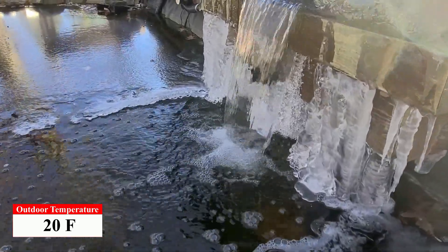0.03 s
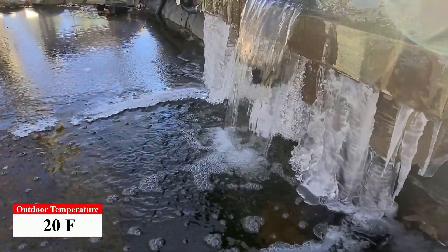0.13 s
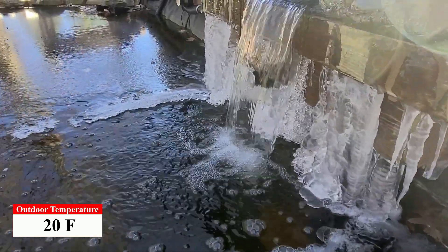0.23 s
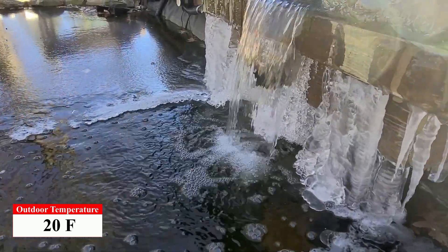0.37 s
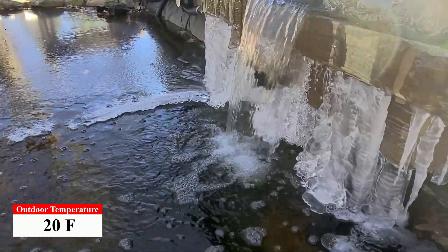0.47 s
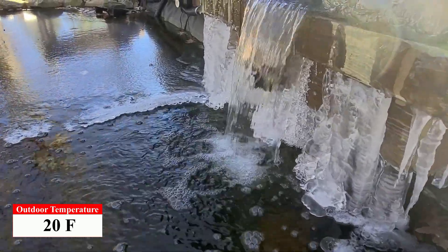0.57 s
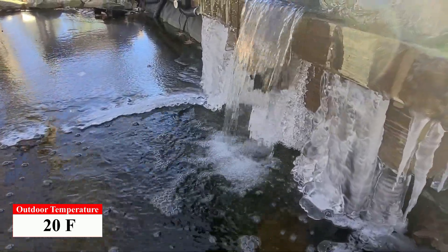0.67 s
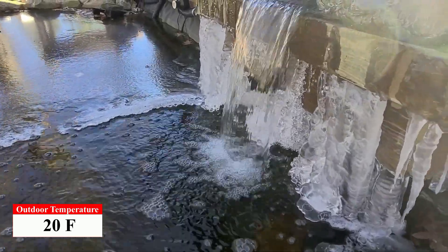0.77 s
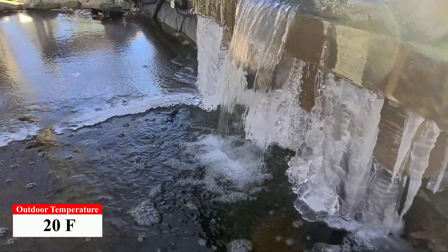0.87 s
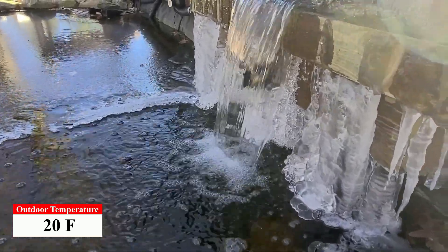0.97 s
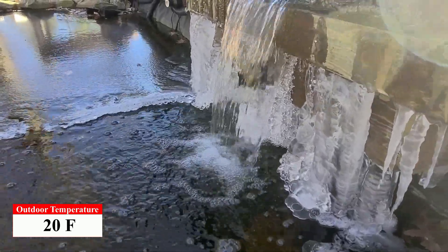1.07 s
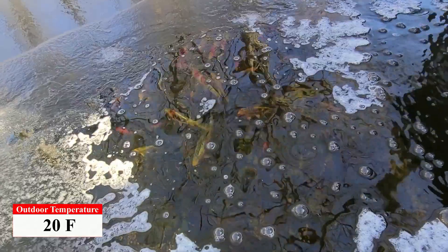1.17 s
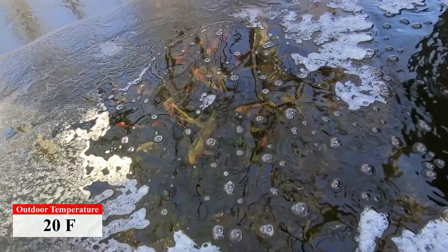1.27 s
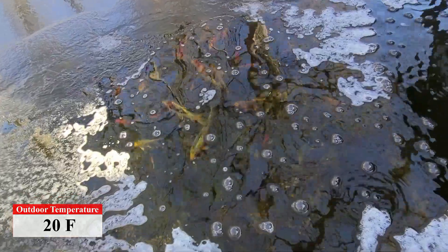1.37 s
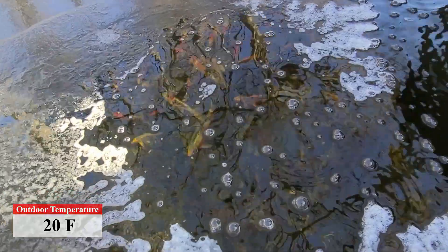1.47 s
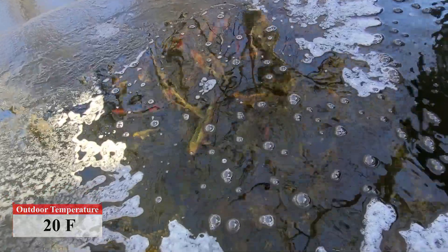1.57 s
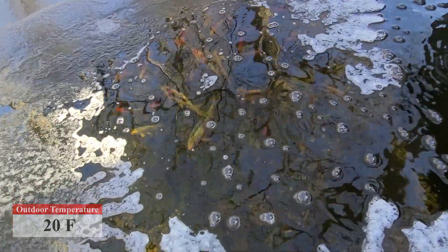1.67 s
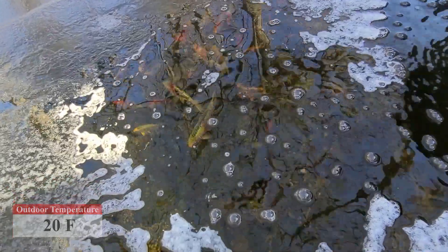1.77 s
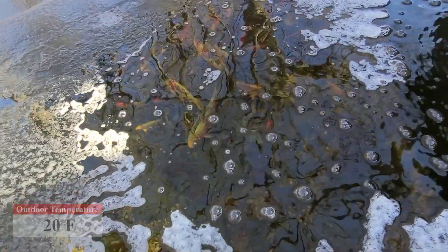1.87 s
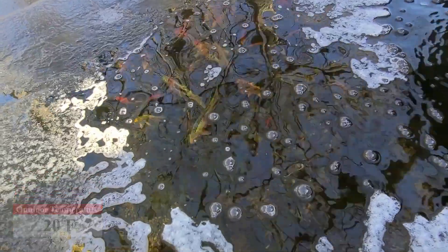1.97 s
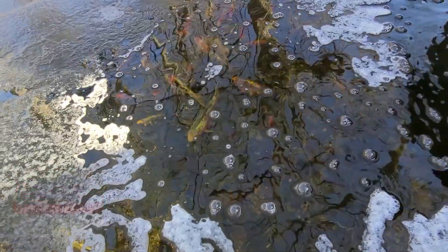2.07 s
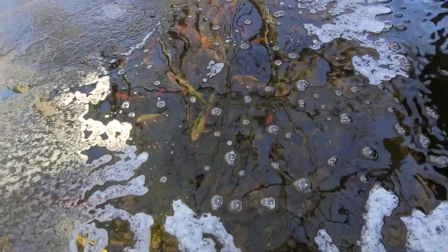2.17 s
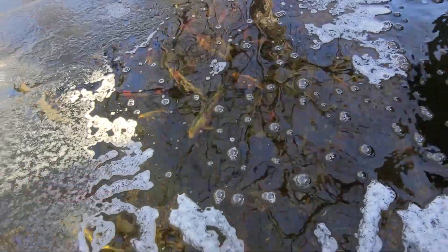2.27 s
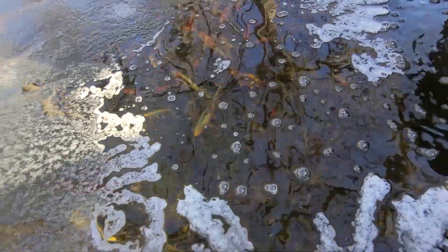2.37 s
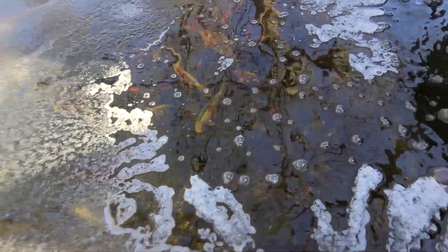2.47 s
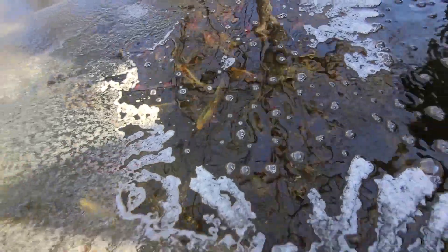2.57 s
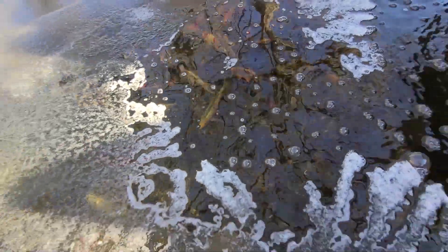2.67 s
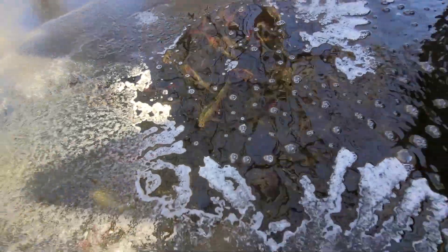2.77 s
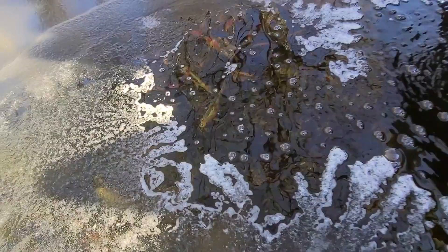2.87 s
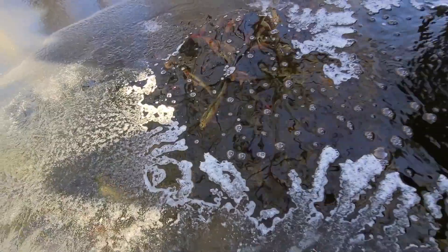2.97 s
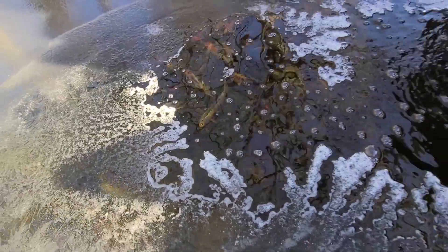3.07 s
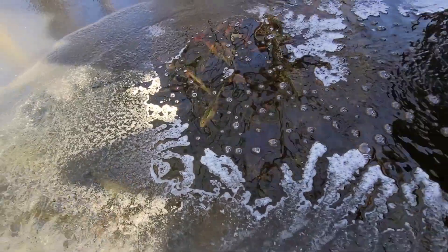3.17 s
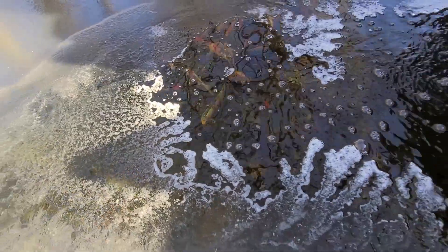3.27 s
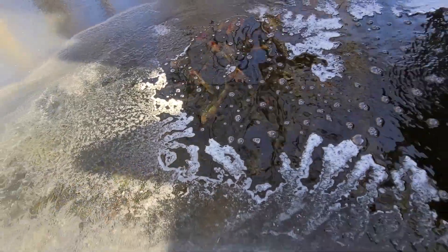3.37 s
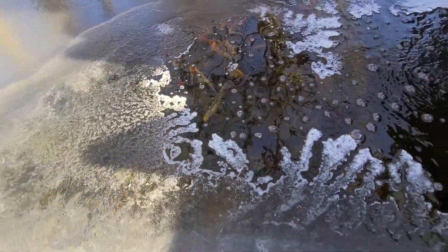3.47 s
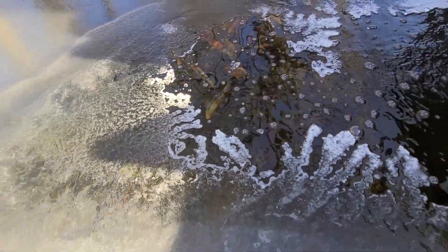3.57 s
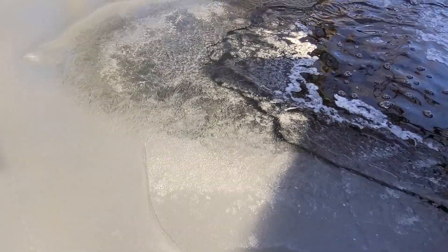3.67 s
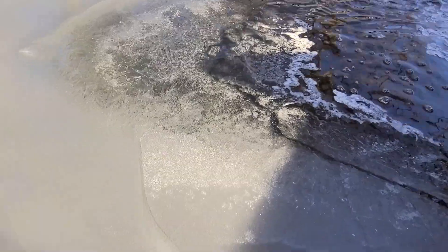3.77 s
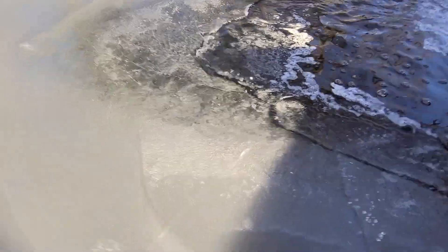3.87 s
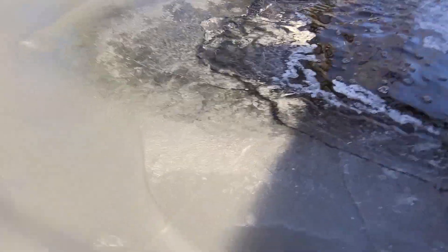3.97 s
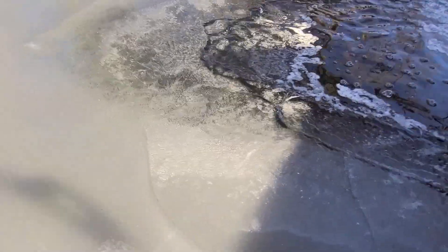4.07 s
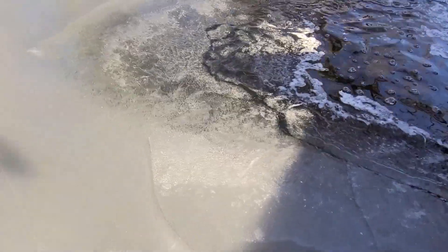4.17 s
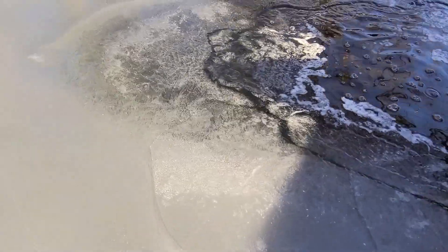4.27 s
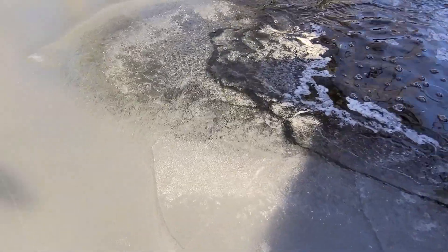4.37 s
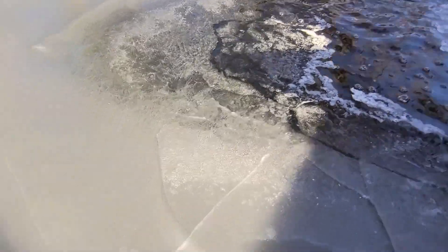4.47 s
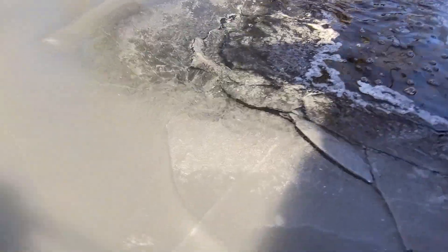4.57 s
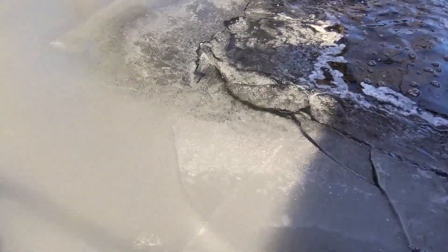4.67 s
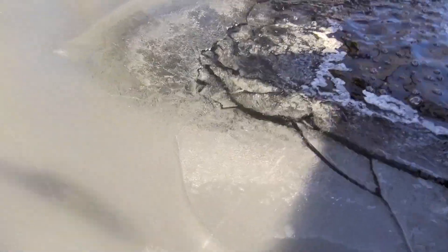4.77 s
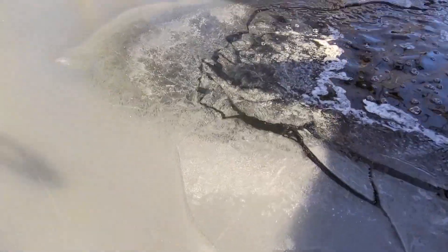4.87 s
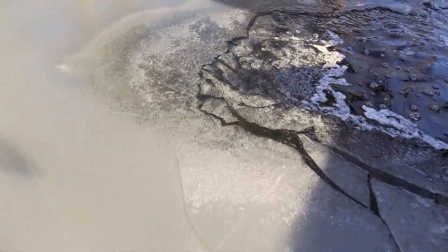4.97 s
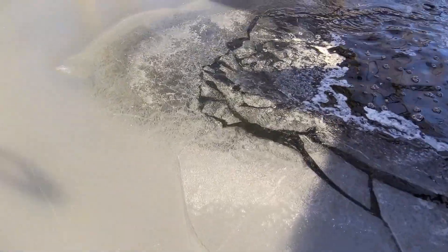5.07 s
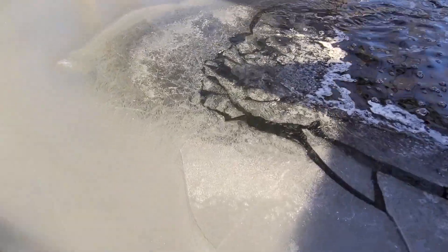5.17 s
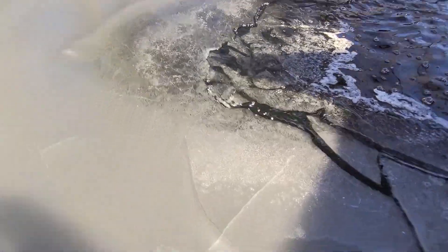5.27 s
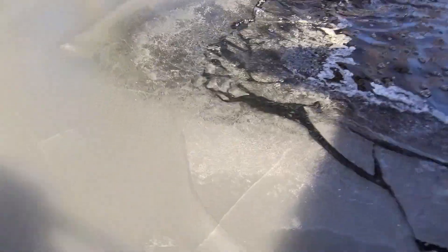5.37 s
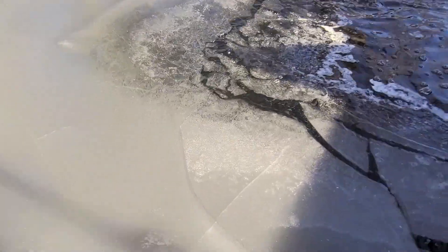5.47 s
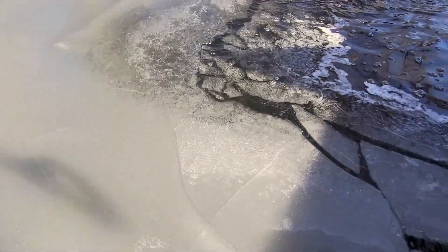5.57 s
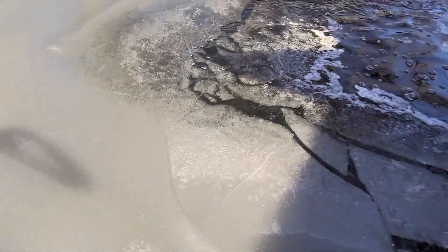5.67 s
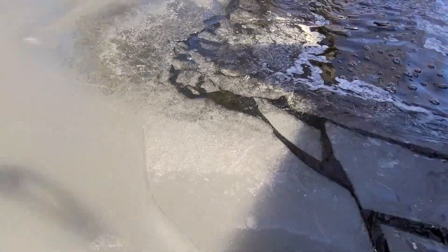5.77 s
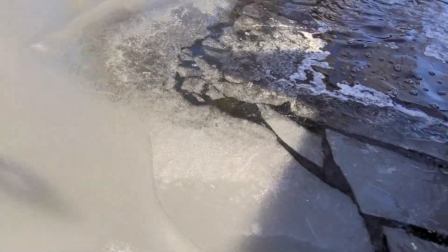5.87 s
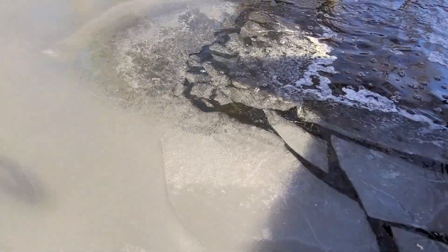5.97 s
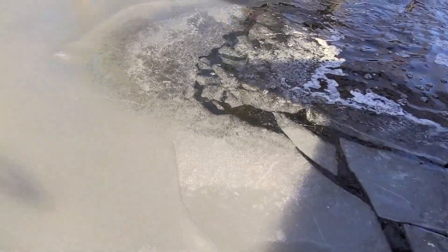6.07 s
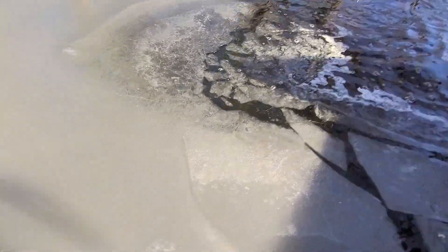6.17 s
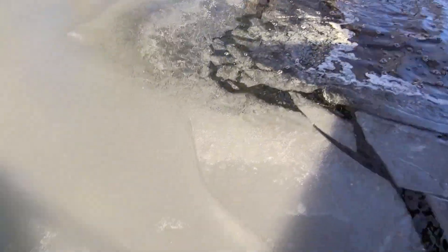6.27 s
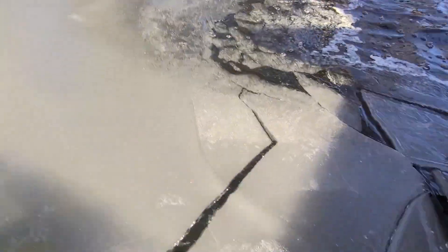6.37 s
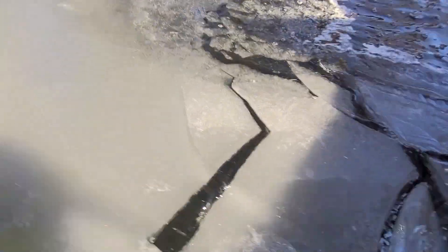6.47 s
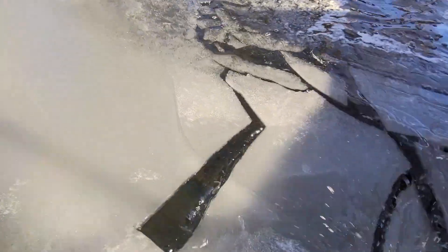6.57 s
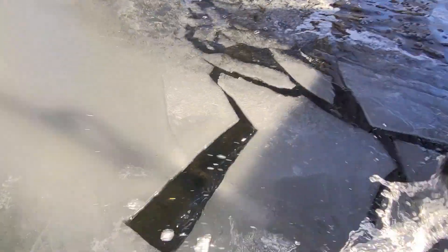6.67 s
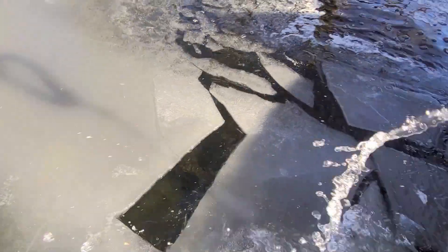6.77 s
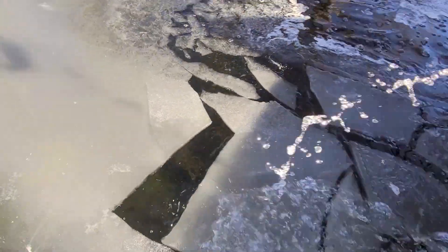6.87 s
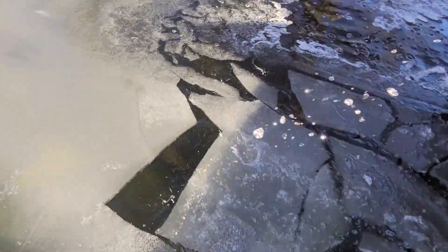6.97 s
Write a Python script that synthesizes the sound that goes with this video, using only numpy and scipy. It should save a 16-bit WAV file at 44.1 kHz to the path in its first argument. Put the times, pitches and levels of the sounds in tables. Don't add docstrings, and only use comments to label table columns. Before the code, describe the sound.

Steady close pond waterfall with bubbling drops; later four sharp, crunching knocks on ice ring and boom, the last breaking through into gulping water.

```python
import sys
import numpy as np
from scipy import signal
from scipy.fft import rfft, irfft, next_fast_len
from scipy.io import wavfile
from scipy.ndimage import uniform_filter1d, map_coordinates

SR = 44100
rng = np.random.default_rng(int(sys.argv[2]) if len(sys.argv) > 2 else 0)


def to_linear_factor(level_db):
    exponent = np.asarray(level_db, float) / 20
    return 10 ** exponent


def put_to_file(sound):
    columns = np.atleast_2d(sound).T
    safe = np.clip(columns, -1, 1)
    whole_steps = np.round(safe * 32767)
    wavfile.write(sys.argv[1], SR, whole_steps.astype(np.int16))


N = 309135
LAG_S = 20 / SR

# (roar [dB], spray [dB], spray drift as the view turns [dB/s])
TAKE_LEVELS = [
    (-35, -42.5, 1),
    (-34.5, -41, -1.25),
    (-38, -49, 0.5),
    (-35.5, -45.5, -1.5),
]
TAKE_JOINS = [
    1.175,
    3.642,
    5.778,
]
# (time [s], level [dB])
RUMBLE_LEVEL = [(0, -37), (0.36, -33.5), (1.17, -36.5), (1.19, -47), (1.5, -37.5), (2.32, -40),
                (2.75, -41.5), (2.96, -40.5), (3.12, -39), (3.3, -35), (3.63, -40), (3.66, -39), (4.2, -40),
                (5.0, -38), (5.77, -39.5), (6.0, -37.5), (6.6, -36.5), (7.01, -42)]
# (time [s], depth [dB])
GAIN_DUCKS = [
    (3.642, 4.5),
    (3.87, 9.5),
    (4.52, 7.5),
    (5.28, 7),
    (5.778, 1.5),
    (6.5, 5),
]
# (frequency [Hz], density [dB/Hz])
RUMBLE_SPECTRUM = [(12, -46), (20, -52), (45, -0.5), (64, 5.5), (81, 4.5), (113, -8.5), (248, -21.5),
                   (300, -21.5), (400, -22.5), (520, -32), (880, -120)]
# (frequency [Hz], density [dB/Hz])
ROAR_SPECTRUM = [(120, 0.5), (200, -10.5), (364, -9), (462, -5.5), (540, -5), (729, 1), (972, -1),
                 (1770, -3.5), (2400, -16.5), (3500, -17.5), (4550, -68), (7700, -120)]
# (frequency [Hz], density [dB/Hz])
SPRAY_SPECTRUM = [(1180, -28), (2000, -3), (2240, -2), (3190, -5), (4090, -7), (5190, -11.5), (6880, -12.5),
                  (8820, -9.5), (15100, -18), (16100, -16), (16500, -47)]
# (frequency [Hz], likeness [-1 to 1])
RUMBLE_LIKENESS = [(60, 1), (130, 0.94), (290, 0.69), (640, 0.89), (1410, -0.11), (3100, -0.56),
                   (6820, 0.13), (15000, -0.58)]
# (frequency [Hz], likeness [-1 to 1])
FALLS_LIKENESS = [(300, 0.99), (700, 0.12), (1400, 0.096), (3000, 0.44), (6000, 0.054), (12000, 0.046)]
# (frequency [Hz], left minus right [dB])
POND_LEAN = [(60, -2), (110, 0), (200, -3), (380, -0.5), (700, -1.5), (1290, 1), (2380, 0.0), (4400, -0.5),
             (8120, -4), (15000, -5)]
# (time [s], peak [dB], pitch [Hz], left minus right [dB])
DROP_CLUSTERS = [(0.019, -26.5, 5230, 3), (0.1217, -23, 1780, 0), (0.1916, -22, 1480, 0),
                 (0.2414, -28, 3400, 2), (0.3362, -26, 2430, 9), (0.3672, -23, 900, 1),
                 (0.437, -26, 1360, 1), (0.5118, -26, 1870, 0), (0.5507, -21.5, 3250, -1),
                 (0.6365, -30, 1780, -2), (0.6785, -27, 2730, 4), (0.6894, -30, 4070, 0),
                 (0.7004, -24, 1350, 1), (0.7503, -23, 935, 1), (0.7633, -24, 1250, 0),
                 (0.768, -30, 5200, 0), (0.871, -30, 3900, 0), (0.9329, -24, 3300, 1),
                 (0.9518, -22, 1940, 0), (0.9648, -32, 5850, 4), (0.9678, -21.5, 1240, -9),
                 (0.9778, -32, 3120, 1), (1.1055, -28, 5200, 9), (1.3027, -23, 1990, 5),
                 (1.3895, -32, 3470, 2), (1.4065, -31, 2520, 0), (1.4574, -22, 765, -4),
                 (1.8295, -26, 1310, 9), (1.8784, -27, 1310, -2), (2.0869, -26, 1890, 1),
                 (2.1209, -33, 4080, -4), (2.517, -31, 1450, 0), (2.6726, -30, 2700, 6),
                 (2.6776, -27, 2050, 6), (2.6836, -26, 1380, 9), (2.7883, -34, 5100, -1),
                 (2.8971, -33, 4000, -5), (2.9131, -26, 1920, 3)]
# (time [s], peak [dB], pitch [Hz], left minus right [dB])
BRIGHT_DROPS = [(0.0199, -22.5, 2340, 3), (0.0493, -23, 3330, 4.5), (0.1007, -22.5, 3320, 3.5),
                (0.232, -30, 2530, 7), (0.3287, -27, 3200, 2), (0.3691, -22, 3670, 3.5),
                (0.4683, -28, 3220, 0), (0.5327, -26, 8600, -1.5), (0.551, -22, 3180, -2.5),
                (0.69, -17.5, 3480, 3), (0.815, -22.5, 3220, 0), (0.9403, -19, 3180, 3),
                (0.9577, -23, 2570, -6), (1.0091, -22.5, 3800, -0.5), (1.0809, -26, 2320, 8),
                (1.0984, -18.5, 2640, 4), (1.2182, -35, 2470, -1), (1.3418, -27, 2440, 3),
                (1.3903, -24, 2550, 2), (1.5579, -25, 4000, -8), (1.5933, -25.5, 2670, -2),
                (1.802, -29, 2440, 1), (2.1783, -25, 2600, 2), (2.4244, -24, 2490, 0),
                (2.6768, -20.5, 2600, 2.5), (2.7896, -24, 2500, 2), (2.8449, -28, 3750, 1.5),
                (2.8978, -26.5, 3080, 0), (3.1098, -24, 3580, -4.5), ]
# (time [s], peak [dB], pitch [Hz], left minus right [dB])
SINGLE_DROPS = [(0.0275, -27.5, 1930, -6), (0.0566, -23, 1240, 0.5), (0.217, -26, 990, -1),
                (0.329, -30, 1900, 0), (0.4314, -32, 1350, 4), (0.492, -27, 1450, -0.5),
                (0.575, -19, 1260, 0.5), (0.6536, -28, 1800, 1), (0.676, -21, 1220, 0),
                (0.9525, -26, 1270, 3), (1.0095, -23, 1400, -1), (1.137, -23, 1210, 1.5),
                (1.186, -26, 1140, 4), (1.5663, -28, 1280, 8), (1.76, -29, 1590, 0.5),
                (1.827, -29, 1090, 7), (2.329, -25, 1680, 5), (2.601, -31, 1790, -0.5),
                (2.809, -21, 1250, 4.5), (3.105, -26, 1160, 2), (3.1348, -26, 1310, 0.5),
                (3.4062, -33, 1380, 2), (3.462, -27, 1100, 4), (3.5428, -27, 1260, -2.5)]
# (time [s], peak [dB], pitch [Hz], left minus right [dB])
FLYING_CHIPS = [(0.7696, -22.5, 8600, 2.5), (0.967, -27, 11400, 4), (4.3044, -40, 8920, -4),
                (4.367, -44, 10500, 0), (4.45, -36, 9080, -3), (4.5977, -36, 11000, -2.5),
                (4.755, -38, 11500, 0), (4.93, -43, 12000, 1), (5.3288, -32, 8100, 0.5),
                (5.8175, -48, 8650, -4), (6.1836, -38, 6510, -1), (5.4012, -26.5, 7900, -3.5),
                (5.468, -40, 9000, -5), (5.527, -34, 14600, -2), (5.5453, -36, 7530, -6),
                (5.6411, -37, 9430, 4), (6.4068, -27, 8800, 0), (6.4951, -18.5, 9400, -9),
                (6.55, -37, 9300, -13), (6.552, -19, 7700, -4), (6.645, -40, 7600, 8),
                (6.6894, -42, 11800, -4), (6.7101, -39, 7570, -5), (6.9471, -17, 8800, 3),
                (6.98, -31, 11100, 3)]
# (time [s], start pitch [Hz], end pitch [Hz], length [s], level [dB])
GULP_BUBBLES = [(2.508, 572, 636, 0.079, -33.5), (3.605, 520, 574, 0.022, -36.5),
                (6.489, 490, 630, 0.0165, -17.5), (6.502, 228, 1070, 0.067, -25.5),
                (6.687, 380, 520, 0.013, -37.5), (6.7, 760, 980, 0.03, -40),
                (6.845, 800, 1150, 0.0073, -32), (6.856, 1420, 1510, 0.017, -30),
                (6.923, 1960, 2000, .014, -34), (6.984, 1000, 1350, 0.014, -39),
                (6.828, 1340, 1900, 0.011, -32), (6.449, 562, 850, 0.028, -29),
                (6.89, 425, 524, 0.018, -41), (6.914, 940, 1000, 0.017, -34)]
# (time [s], hold [s], slush [dB], crunch [dB], ring [dB])
CRUSHES = [(3.798, 0.01, -40, -50, -60), (3.814, 0.013, -32.5, -20, -25.5), (3.837, 0.034, -38, -41, -25),
           (4.44, 0.033, -45.5, -44, -53), (4.476, 0.014, -29.5, -22.5, -23),
           (4.494, 0.04, -37.5, -36, -28), (5.211, 0.023, -32, -27.5, -25), (5.239, 0.056, -31, -35, -30.5),
           (6.318, 0.017, -28.5, -24.5, -18.5), (6.344, 0.018, -27.5, -22, -19.5),
           (5.298, 0.034, -60, -44, -38), (6.371, 0.04, -45, -35, -27), (6.427, 0.006, -26, -33, -26),
           (6.444, 0.034, -31, -31.5, -32), (6.488, 0.024, -28.5, -27, -31.5),
           (6.529, 0.039, -37, -41, -50), (6.677, 0.022, -44, -40, -48), (6.794, 0.055, -43.5, -55, -68),
           (6.846, 0.088, -34.5, -46, -66), (6.936, 0.072, -39.5, -52, -66)]
# (frequency [Hz], density [dB/Hz])
SLUSH_SPECTRUM = [(700, -57), (1500, -5), (2300, 9), (3600, 12.5), (6000, 6), (10000, 7), (15000, 1),
                  (16500, -11)]
# (frequency [Hz], density [dB/Hz])
CRUNCH_SPECTRUM = [(260, -52), (450, -7.5), (800, -1), (1100, -4.5), (1900, -16.5), (2600, -34),
                   (4000, -22), (6600, -90)]
# (frequency [Hz], density [dB/Hz])
THUMP_SPECTRUM = [(30, -40), (100, 13), (130, 11), (220, 4), (300, -33), (500, -62)]
# (pitch [Hz], level [dB], unsteadiness [rad])
SHEET_MODES = [(237, -7.5, 1.3), (278.3, -3, 0.97), (335.6, -4.5, 1.67), (380, 3.5, 0.79),
               (439, -9.5, 1.55), (533, -8.5, 1.7)]
CRUSH_T60 = [0.065, 0.045, 0.19, 0.31]
TAIL_DB, TAIL_S = [-16, -3, -20.5, -22], [1, 0.24, 0.57, 0.46]
# (frequency [Hz], left minus right [dB])
POLE_BALANCE = [(80, -6), (300, -3.5), (800, -1), (4000, -6), (9000, -6)]
# (time [s], peak [dB], pitch [Hz], left minus right [dB])
SHARD_RINGS = [(3.803, -32, 8000, -3), (3.814, -22, 7800, -3), (3.823, -12, 720, -10),
               (3.8203, -16.5, 4400, 2), (3.838, -13, 920, -11), (3.8499, -22, 1890, -10),
               (3.8519, -28, 1270, -9), (3.8645, -20, 1900, -1), (4.485, -29, 1960, -2),
               (4.486, -7, 756, 0), (4.498, -10.5, 860, 5), (4.4796, -15, 4100, 0), (4.5159, -29, 1830, -2),
               (5.217, -14, 1180, 14), (5.219, -7, 770, 1), (5.22, -15.5, 1960, 8), (5.231, -14, 860, 8),
               (5.2409, -26, 1440, 9), (5.2133, -18, 3010, -3), (5.254, -23, 10200, -2),
               (5.2798, -29, 1180, -9), (5.2888, -22, 1680, -3), (5.2958, -29, 1290, 2),
               (4.474, -25, 7800, -3), (6.323, -11, 646, -2), (6.336, -11.5, 1980, 1.5),
               (6.3539, -17, 1970, -3), (6.3599, -19, 1160, 3), (6.3609, -13, 1910, -3),
               (6.3659, -21, 1060, -4)]
# (time [s], crack [dB], push above the crack [dB])
CONTACTS = [(3.8075, -42, 25), (3.815, -34, 30.5), (3.8202, -5, 3), (3.8655, -21, 2), (4.468, -45, 24),
            (4.4745, -33, 25.5), (4.4794, -5, 2), (5.2083, -26, 19), (5.2133, -2.5, -2), (5.2547, -25, -14),
            (6.317, -35, 21), (6.337, -20, 1), (6.3248, -7.5, 9.5), (6.3564, -14, -3)]
# (frequency [Hz], density [dB/Hz])
SNAP_SPECTRUM = [(1000, -3), (1600, -1), (4480, 0), (7340, -6), (9690, -12), (12300, -11), (16500, -37)]
# (time [s], pitch [Hz], level [dB], t60 [s])
SHEET_BOOMS = [
    (3.816, 84, -21, 0.092),
    (3.848, 76.4, -17, 0.37),
    (4.476, 90, -31, 0.091),
    (4.507, 73.8, -16.5, 0.31),
    (5.212, 83, -30, 0.17),
    (5.241, 75.6, -16.5, 0.4),
    (6.319, 76, -17.5, 0.27),
    (6.354, 77, -12.5, 0.44),
    (6.839, 74.6, -28, .2),
    (6.935, 70, -25, 0.17),
]
# (time [s], peak [dB], pitch [Hz], left minus right [dB])
ICE_TICKS = [(4.117, -34.5, 2710, 6), (4.1794, -39, 2690, -7), (4.2394, -36, 4300, 2),
             (5.8212, -26.5, 2190, -5), (6.433, -30, 2300, -1), (6.4936, -27, 3000, -6),
             (3.847, -22, 3960, 1.5), (5.256, -23, 3500, 3), (6.51, -17, 4160, 0.5),
             (6.8536, -19, 2270, 2.5), (6.9344, -21.5, 1980, 2)]
# (time [s], peak [dB], pitch [Hz], left minus right [dB])
SHEET_RERINGS = [
    (3.861, -13.5, 384, -6),
    (5.229, -12, 375, -1),
    (5.328, -21.5, 372, -3),
    (6.351, -14, 362, -5),
    (6.405, -18, 332, -6),
]
# (time [s], peak [dB], pitch [Hz], left minus right [dB])
SPLASH_BUBBLES = [(6.431, -20, 800, -7), (6.433, -23, 3770, -12), (6.433, -16, 2640, -4),
                  (6.434, -28, 1830, 3), (6.441, -26, 1830, -1), (6.4499, -27, 3360, -2),
                  (6.4499, -27, 3750, -8), (6.4499, -27, 1850, -4), (6.4559, -22, 1710, 3),
                  (6.4589, -20, 2800, 0), (6.4619, -28, 3830, 1), (6.4629, -24, 1830, -2),
                  (6.4819, -27, 1490, -4), (6.4839, -30, 3420, -4), (6.4928, -24, 3680, -12),
                  (6.4928, -23, 1870, -4), (6.4988, -24, 3660, -5), (6.4998, -14.5, 964, -3),
                  (6.5018, -27, 4040, -1), (6.5128, -29, 3600, -8), (6.5188, -29, 4350, -4),
                  (6.5208, -23, 985, -4), (6.5477, -28, 3400, -7), (6.825, -25, 1350, 6),
                  (6.829, -28, 2100, 2), (6.8479, -19, 1050, 1), (6.8569, -25, 1490, 1),
                  (6.8758, -25, 2800, 5), (6.8788, -21, 1550, -1), (6.8898, -32, 2560, 4),
                  (6.9028, -27, 1720, 8), (6.9108, -24, 945, 2), (6.9177, -25, 2130, 4),
                  (6.9207, -23, 2480, -2), (6.9277, -27, 2990, -11), (6.9706, -29, 1450, 9),
                  (6.9836, -32, 1030, -9)]


def unit(x):
    return x / np.sqrt(np.mean(x ** 2) + 1e-20)


def even(x, window_s):
    power = uniform_filter1d(x * x, size=round(window_s * SR))
    return x / np.sqrt(np.abs(power) + 1e-9)


def along(points, hz):
    f, v = np.transpose(points)
    return np.interp(np.log(hz + 1), np.log(f + 1), v)


def leaning(points, hz):
    return to_linear_factor(along(points, hz) * np.array([[.5], [-.5]]))


def filtered(x, response):
    m = next_fast_len(N + 8192)
    return irfft(rfft(x, m) * response(np.fft.rfftfreq(m, 1 / SR)), m)[..., :N]


def wobble(rate):
    steps = np.arange(0, N + 16, 16)
    knots = rng.standard_normal(int(N * rate / SR) + 4)
    return np.interp(np.arange(N), steps, map_coordinates(knots, [steps * rate / SR]))


def rush(spectrum, alike, patchy_db, gain=1):
    z = signal.stft(gain * rng.standard_normal((2, N)), nperseg=512)[2]
    field = uniform_filter1d(rng.standard_normal(z.shape[1:]), size=5, axis=0)
    field = uniform_filter1d(field, size=3, axis=1)
    pair = signal.istft(z * to_linear_factor(patchy_db * unit(field)), nperseg=512)[1][:, :N]

    def mid_side(hz):
        turn = np.arccos(np.clip(along(alike, hz), -1, 1)) / 2
        return to_linear_factor(along(spectrum, hz)) * np.array([np.cos(turn), np.sin(turn)])

    mid, side = filtered(pair, mid_side)
    return unit(np.array([mid + side, mid - side]))


def bubbles(s, db, hz, pan_db, turns, rise, size=600, late=None):
    t = np.arange(size) / SR
    late = -np.tanh(pan_db / 3) if late is None else late
    u = hz[:, None] * t / turns
    wave = to_linear_factor(db)[:, None] * np.sin(2 * np.pi * turns * (u + rise * u * u / 2))
    wave *= np.exp(-u) * (1 - np.exp(-6 * u))
    wave *= hz[:, None] * (1 + rise * u) < SR / 2.6
    wave *= np.cos(np.pi / 2 * t / t[-1])
    out = []
    for side in (1, -1):
        start = s + side * LAG_S / 2 * late + LAG_S
        at = (start * SR).astype(int)[:, None] + np.arange(size)
        heard = wave * to_linear_factor(side * pan_db / 2)[:, None]
        out.append(np.bincount(at.ravel(), heard.ravel(), N + SR)[:N])
    return np.array(out)


def swarm(count, hz, spread, turns, scatter_db, size):
    r, g = rng.random((count, 2)), rng.standard_normal((count, 2))
    pitch = np.clip(hz * np.exp(spread * g[:, 0]), 300, 15000)
    db = -scatter_db * np.log(r[:, 1] + .03)
    return unit(bubbles(r[:, 0] * N / SR, db, pitch, 3 * g[:, 1], turns, rise=0.15, size=size))


def short_rings(rows, life_s, gain_db, rise, late):
    s, db, hz, pan_db = np.transpose(rows)
    return bubbles(s, db + gain_db, hz, pan_db, life_s * hz[:, None], rise, size=2400, late=late)


def bursts(s, db, t60):
    u = np.arange(500) / SR
    puff = to_linear_factor(db[:, None] - 60 * u / t60) * rng.standard_normal((len(s), len(u)))
    at = (s * SR).astype(int)[:, None] + np.arange(len(u))
    return np.bincount(at.ravel(), puff.ravel(), N + SR)[:N]


def splats(rows, edge_hz, spit_db, turns):
    s, db, hz, pan_db = np.transpose(rows)
    spit = np.array([bursts(s, db + spit_db + side * pan_db / 2, t60=0.021) for side in (1, -1)])
    band = lambda f: f * f / (f * f + edge_hz ** 2) / (1 + (f / edge_hz / 3.6) ** 2)
    out = filtered(spit, band) + bubbles(s, db, hz, pan_db, turns, rise=0.0092)
    after, ratio = rng.random((len(s), 2)).T
    second_hz = hz * (.7 + 0.596 * ratio)
    return out + bubbles(s + 0.011 * after, db - 7.5, second_hz, pan_db, turns, rise=0.164)


def from_right(x, lag_s=LAG_S):
    half = np.array([[.5], [-.5]])
    delay = lambda hz: np.exp(-2j * np.pi * hz * lag_s * half)
    return filtered(x, lambda hz: leaning(POLE_BALANCE, hz) * delay(hz))


def ducking():
    pull_s, recover_s = 0.058, 0.46
    t = np.arange(N) / SR
    take = np.searchsorted(TAKE_JOINS, t, side="right")
    out = np.zeros(N)
    for s, depth_db in GAIN_DUCKS:
        u = np.maximum(t - s, 0)
        own = np.searchsorted(TAKE_JOINS, s + .01)
        at_join = abs(s - TAKE_JOINS[own - 1]) < .01
        down = 1 if at_join else 1 - np.exp(-u / pull_s)
        out -= depth_db * down * np.exp(-u / recover_s) * (take == own)
    return out, take, t


def far_rumble():
    duck_db, _, t = ducking()
    level_db = np.interp(t, *np.transpose(RUMBLE_LEVEL)) + duck_db
    swell = to_linear_factor(wobble(4.66))
    rumble = to_linear_factor(level_db + 3.5) * swell * rush(RUMBLE_SPECTRUM, RUMBLE_LIKENESS, patchy_db=-1.5)
    return filtered(rumble, lambda hz: leaning(POND_LEAN, hz))


def waterfalls():
    duck_db, take, t = ducking()
    roar_db, spray_db, drift = np.array(TAKE_LEVELS)[take].T
    roar_db = roar_db + duck_db
    spray_db = spray_db + drift * (t - np.r_[0, TAKE_JOINS][take]) + duck_db
    ahead = t < TAKE_JOINS[0]
    drop_gain = to_linear_factor(np.where(ahead, -6, -9))
    surge = wobble(9.04)

    bubbling = swarm(count=4000, hz=1144, spread=0.367, turns=6.5, scatter_db=0.5, size=480)
    roar = rush(ROAR_SPECTRUM, FALLS_LIKENESS, patchy_db=1.04) + drop_gain * bubbling
    spatter = swarm(count=5000, hz=3600, spread=0.43, turns=4.1, scatter_db=6.5, size=240)
    spray = rush(SPRAY_SPECTRUM, FALLS_LIKENESS, patchy_db=2.5, gain=to_linear_factor(1.37 * wobble(60)))
    spray = spray + drop_gain * spatter

    falls = to_linear_factor(roar_db + 2.5 + 0.26 * surge) * roar
    falls += to_linear_factor(spray_db + 3.0 + np.where(t < TAKE_JOINS[1], 1.3, .4) * surge) * spray
    late_left = np.roll(falls[0], round(LAG_S * SR))
    falls[0] = np.where(ahead, falls[0], late_left)
    return filtered(falls, lambda hz: leaning(POND_LEAN, hz))


def clusters():
    return short_rings(DROP_CLUSTERS, life_s=.0045, gain_db=0.5, rise=.04, late=.01)


def near_drops():
    bright = splats(BRIGHT_DROPS, edge_hz=2400, spit_db=0.5, turns=7)
    return bright + bubbles(*np.transpose(SINGLE_DROPS), turns=17.0, rise=0.052)


def chips():
    return splats(FLYING_CHIPS, edge_hz=7500, spit_db=3.5, turns=9.5)


def gulps():
    out = np.zeros(N)
    for s, hz, end_hz, length, db in GULP_BUBBLES:
        u = np.arange(round(length * SR)) / (length * SR)
        phase = 2 * np.pi * np.cumsum(hz * (end_hz / hz) ** u) / SR
        swell = to_linear_factor(db + 4 - 11 * u) * np.sin(np.pi * u ** .8) ** .45
        out[round(s * SR):][:len(u)] += swell * np.sin(phase)
    flutter = to_linear_factor(4 * wobble(160))
    return from_right(out * flutter, lag_s=LAG_S / 3)


def crush_levels():
    rise_s, thump_db = 0.0067, -11
    power, u = np.zeros((4, N + SR)), np.arange(SR // 3) / SR
    for s, hold, slush_db, crunch_db, ring_db in CRUSHES:
        after = np.maximum(u - hold, 0)
        fall = to_linear_factor(-60 * after / np.c_[CRUSH_T60])
        fall = fall + to_linear_factor(np.c_[TAIL_DB] - 60 * after / np.c_[TAIL_S])
        level = to_linear_factor(np.c_[[slush_db, crunch_db, ring_db, ring_db + thump_db]])
        power[:, round(s * SR):][:, :len(u)] += (level * fall * (1 - np.exp(-u / rise_s))) ** 2
    return np.sqrt(power[:, :N])


def gritty_noise(spectrum, grit_db):
    noise = to_linear_factor(grit_db * wobble(300)) * rng.standard_normal(N)
    return unit(filtered(noise, lambda hz: to_linear_factor(along(spectrum, hz))))


def crushed_slush(level):
    grit = swarm(count=7000, hz=3300, spread=0.71, turns=3.7, scatter_db=6.5, size=200)
    hiss = rush(SLUSH_SPECTRUM, [(2000, .1)], patchy_db=1.2, gain=to_linear_factor(1.8 * wobble(150)))
    return level * (hiss + to_linear_factor(-6) * grit) * to_linear_factor([[-.3], [1.5]])


def crunching_ice(level):
    tip, left, right = [level * even(gritty_noise(CRUNCH_SPECTRUM, grit_db=3.5), window_s=0.077)
                        for _ in range(3)]
    around = filtered(np.array([left, right]), lambda hz: hz / (hz + 1500))
    return from_right(tip) + to_linear_factor(1.5) * around


def ringing_sheet(ring, thump):
    t = np.arange(N) / SR
    modes = np.zeros(N)
    for hz, db, rough in SHEET_MODES:
        strength = to_linear_factor(db + 3.6 * rough * wobble(40))
        modes += strength * np.sin(2 * np.pi * hz * t + rough * wobble(60))
    low = gritty_noise(THUMP_SPECTRUM, grit_db=-3.0)
    return from_right(ring * even(modes, window_s=0.035) + thump * even(low, window_s=0.031))


def shards():
    return short_rings(SHARD_RINGS, life_s=.0035, gain_db=-1.5, rise=.001, late=.9)


def cracks():
    knock_hz, deep_hz, knock_s = 800, 460, 0.0066
    s, db, push_db = np.transpose(CONTACTS)
    pushes, u = np.zeros(N), np.arange(900) / SR
    knock = np.sin(2 * np.pi * knock_hz * u) + 0.54 * np.sin(2 * np.pi * deep_hz * u)
    knock *= 1 - np.exp(-u / 0.00024)
    for at, push in zip((s * SR).astype(int), db + push_db):
        pushes[at:][:len(u)] -= to_linear_factor(push + 2.5 - 60 * u / knock_s) * knock
    snaps = []
    for side in (1, -1):
        heard = s + side * LAG_S / 2
        snaps.append(bursts(heard, db + 4.5, t60=0.0052) + bursts(heard, db - 5.5, t60=0.012))
    return from_right(pushes) + filtered(np.array(snaps), lambda hz: to_linear_factor(along(SNAP_SPECTRUM, hz)))


def booms():
    out, u = np.zeros(N + SR), np.arange(SR // 2) / SR
    for s, hz, db, t60 in SHEET_BOOMS:
        swing = to_linear_factor(db - 60 * u / t60) + to_linear_factor(db + 7.0 - 60 * u / 0.024)
        swing *= (1 - np.exp(-u / 0.002)) ** 2
        out[round(s * SR):][:len(u)] -= swing * np.sin(2 * np.pi * hz * u)
    return from_right(out[:N])


def ticks():
    return splats(ICE_TICKS, edge_hz=2600, spit_db=1.5, turns=4.5)


def sheet_rerings():
    return short_rings(SHEET_RERINGS, life_s=.019, gain_db=-1.5, rise=.001, late=.9)


def splatter():
    return short_rings(SPLASH_BUBBLES, life_s=.0045, gain_db=1.5, rise=.05, late=.3)


def scene():
    water = far_rumble() + waterfalls() + clusters() + near_drops() + chips() + gulps()
    slush, crunch, ring, thump = crush_levels()
    ice = crushed_slush(slush) + crunching_ice(crunch) + ringing_sheet(ring, thump)
    ice += shards() + booms() + ticks() + sheet_rerings() + splatter()
    return filtered(water + ice, lambda hz: hz < 15800) + filtered(cracks(), lambda hz: hz < 16750)


def band_limit(x):
    return signal.sosfilt(signal.butter(12, 16450, fs=SR, output="sos"), x)


def record(dry):
    t = np.arange(N) / SR
    for s in TAKE_JOINS:
        dry = dry * np.clip(np.abs(t - s) / 0.01 + 0.14, 0, 1)
    mix = dry / (1 + np.abs(dry / .92) ** 6) ** (1 / 6)
    return band_limit(mix)


dry = scene()
out = record(dry)
put_to_file(out)
```